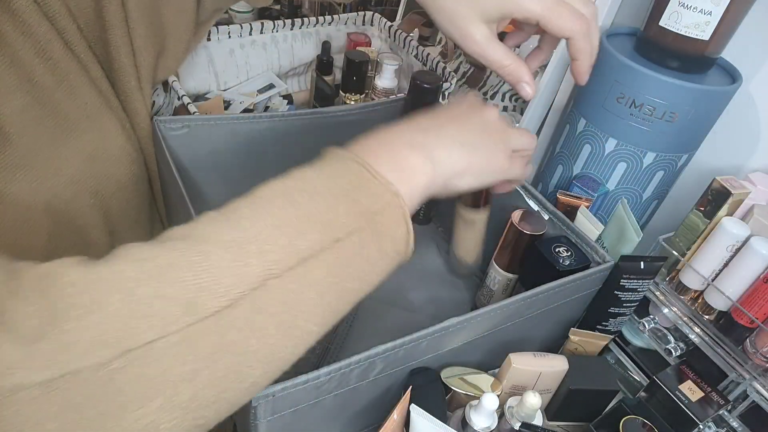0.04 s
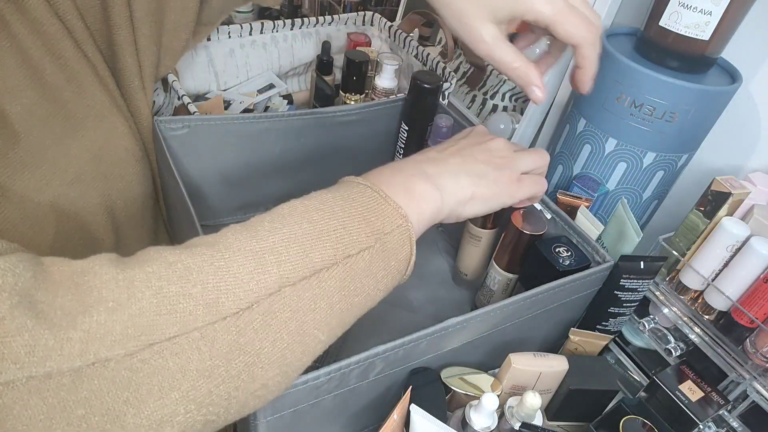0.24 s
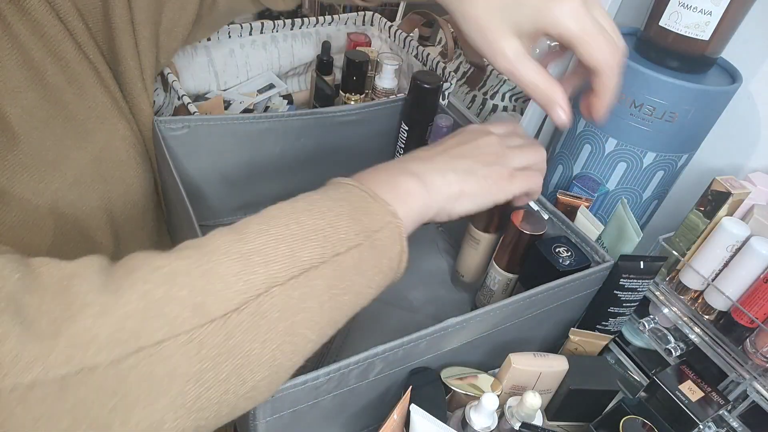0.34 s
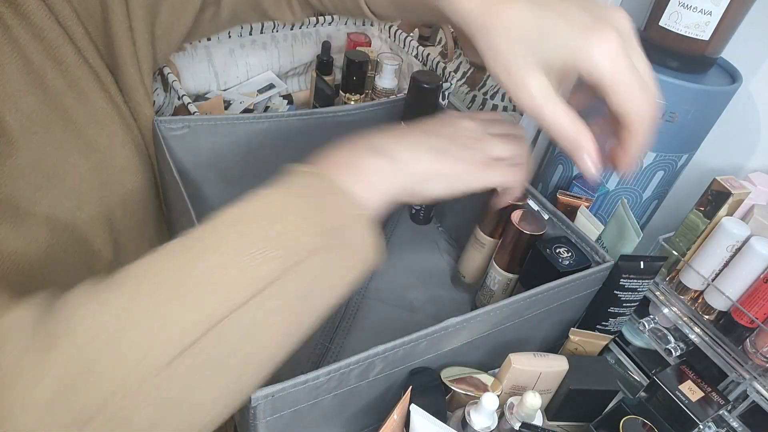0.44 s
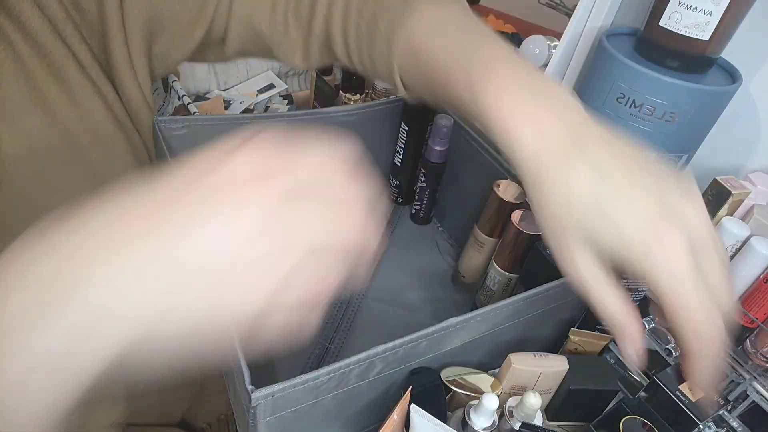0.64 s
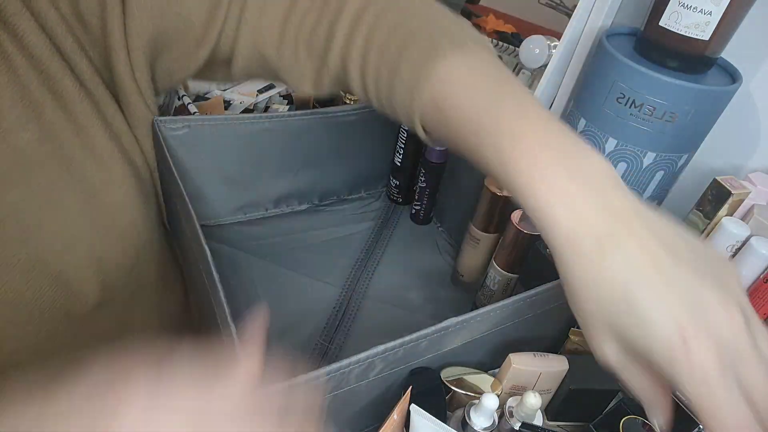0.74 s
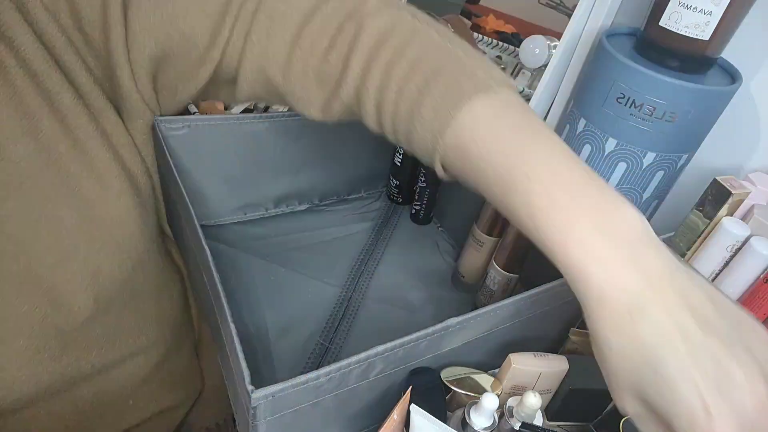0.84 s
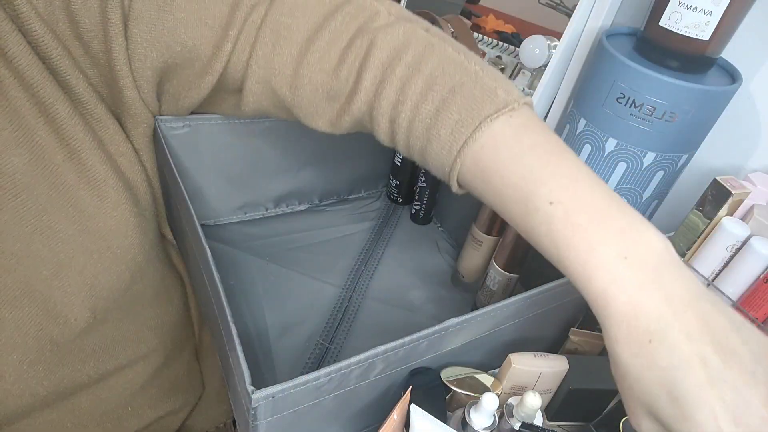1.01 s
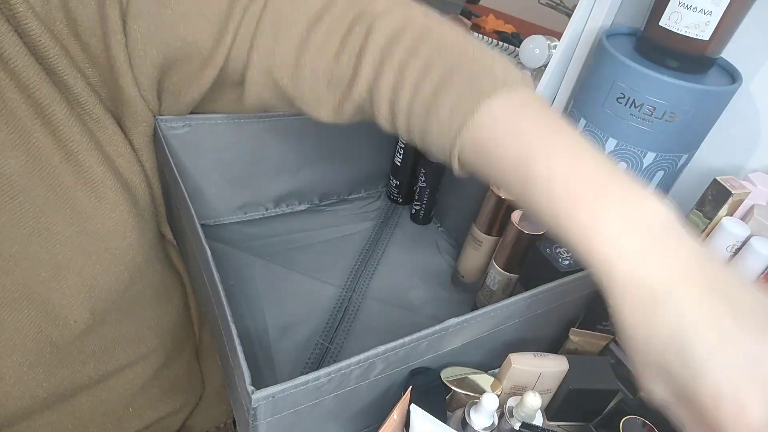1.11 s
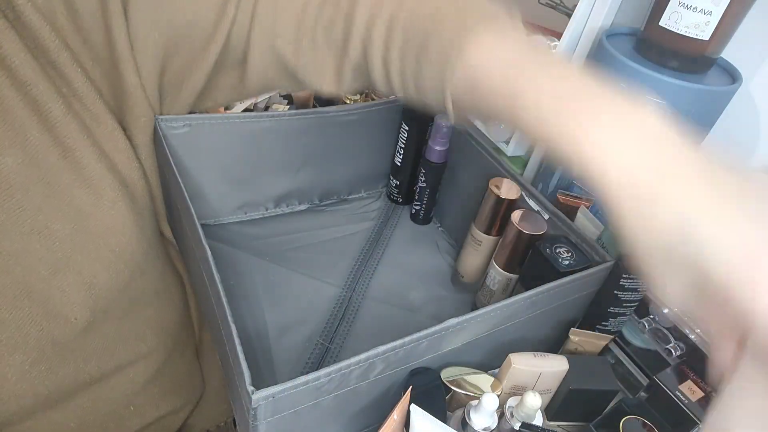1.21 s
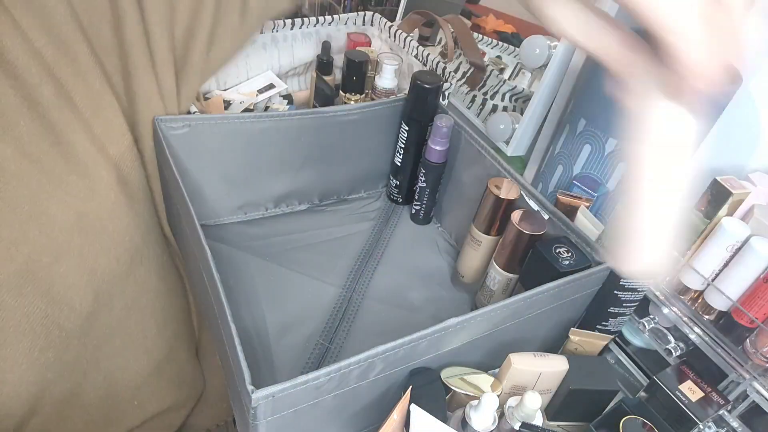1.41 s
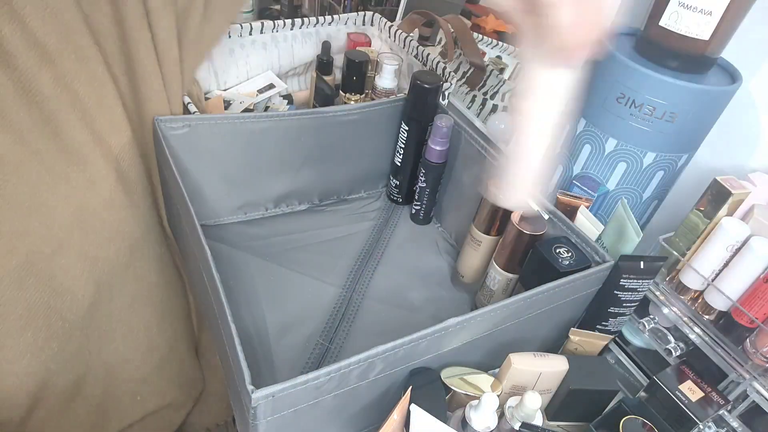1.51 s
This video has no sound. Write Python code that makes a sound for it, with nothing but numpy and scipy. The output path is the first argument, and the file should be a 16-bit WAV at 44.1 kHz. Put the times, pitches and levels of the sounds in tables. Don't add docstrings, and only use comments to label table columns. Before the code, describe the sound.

A hard bottle knock, then dull bumps, a cap click and a glass clink in a box

```python
import sys
import numpy as np
from scipy import signal
from scipy.fft import rfft, irfft
from scipy.io import wavfile
from scipy.ndimage import uniform_filter1d

SR = 44100
rng = np.random.default_rng(int(sys.argv[2]) if len(sys.argv) > 2 else 0)


def nominal_scale(level):
    x = np.asarray(level, float) / 20
    return 10 ** x


def to_wav(sig):
    pcm = np.clip(np.atleast_2d(sig), -1, 1) * 32767
    pcm = np.round(pcm).astype(np.int16)
    wavfile.write(sys.argv[1], SR, pcm.T)


N = 68355


def evened(x):
    return x / np.sqrt(np.mean(x ** 2) + 1e-20)


def read(points, hz):
    f, value = np.transpose(points)
    return np.interp(np.log(hz + 1), np.log(f + 1), value)


def curve(points):
    s, db = np.transpose(points)
    return nominal_scale(np.interp(np.arange(N) / SR, s, db))


def add(mix, s, sound):
    part = mix[round(s * SR):][:len(sound)]
    part += sound[:len(part)]


def noise_pair(shape_gain, same, frames, size):
    a, b, c, d = rng.standard_normal((frames, size // 2 + 1, 4)).T
    same = np.clip(same, -1, 1)[:, None]
    left = a + 1j * b
    right = same * left + np.sqrt(1 - same ** 2) * (c + 1j * d)
    return signal.istft(np.array([left, right]) * shape_gain, nperseg=size, noverlap=size * 3 // 4)[1]


def ring(modes, contact_s, hold_s=1, factor=1, tilt_db=0, side=1):
    t = np.arange(SR // 2) / SR
    x = np.zeros(len(t))
    for k, (hz, db, t60) in enumerate(modes):
        level_db = db + tilt_db * np.log2(hz / modes[1][0]) - 60 * t / t60
        x -= nominal_scale(level_db) * side ** (k + 1) * np.cos(2 * np.pi * hz * factor * t)
    contact = np.sin(np.pi * np.clip(t[:200] / contact_s, 0, 1)) ** 2
    x = np.convolve(x * np.exp(-(t / hold_s) ** 4), contact)
    return x / abs(x).max()


def struck(hits, modes, contact_s, hold_s=1, side=1):
    out = np.zeros(N)
    for s, db, factor, tilt_db in hits:
        add(out, s, nominal_scale(db) * ring(modes, contact_s, hold_s, factor, tilt_db, side))
    return out


def glass_top(x):
    return signal.sosfilt(signal.butter(2, 9300, fs=SR, output="sos"), x)


# frequency in Hz, density in dB per Hz.
TONE = [(20, -2.5), (55, -12), (85, -20), (170, -20.5), (480, -36.5), (1200, -34), (1800, -50), (3000, -59)]
HISS = [(900, 2.5), (1900, -6.5), (2600, -3.5), (5000, -6), (7300, -9), (8200, -24.5), (12400, -24),
        (15000, -63.5)]
# frequency in Hz, likeness 0 to 1.
AIR_SAME = [(40, 0.27), (240, 1), (930, 0.13), (4000, 0.41)]
# time in seconds, level in dB.
GATE = [(0, -8.5), (.235, -5.5), (.26, 7.5), (1.31, 3), (1.39, -5.5), (1.55, -1.5)]
SHAKE = [(0, -69), (.3, -95), (.47, -50), (.6, -59), (1.25, -71.5), (1.4, -82), (1.55, -64)]


def air():
    hz, frames = np.fft.rfftfreq(1024, 1 / SR), N // 256 + 5
    tone_db, hiss_db, shake_corner_hz = -59.5, -69, 55
    tone = evened(noise_pair(nominal_scale(read(TONE, hz))[:, None], read(AIR_SAME, hz), frames, 1024)[:, :N])
    hiss = evened(noise_pair(nominal_scale(read(HISS, hz))[:, None], read(AIR_SAME, hz), frames, 1024)[:, :N])
    shake_gain = 1 / (1 + (hz / shake_corner_hz) ** 4)[:, None]
    shake = evened(noise_pair(shake_gain, .5 + 0 * hz, frames, 1024)[:, :N])
    tone = nominal_scale(tone_db) * curve(GATE) ** 0.38 * tone * nominal_scale([[1.5], [-1.5]])
    hiss = nominal_scale(hiss_db) * curve(GATE) * hiss
    return tone + hiss + curve(SHAKE) * shake * nominal_scale([[2.5], [-2.5]])


# frequency in Hz, level in dB, T60 in seconds.
SLAM_MODES = [(136, -18, 0.17), (246.8, 4.5, 0.027), (480, 9, 0.02), (615, -12, 0.0025), (830, -9, 0.036),
              (1500, -31, 0.0051), (2170, -6.5, 0.02), (3280, -6, 0.006), (5140, -14.5, 0.0018),
              (7000, -9.5, 0.0027), (10160, -16.5, .003)]
RIM_MODES = [(5230, 7, 0.0087), (5590, 7.5, 0.015), (7050, 0.5, 0.015), (7040, -20.5, 0.002),
             (9100, -24, 0.0066), (10600, -21.5, 0.0037), (12400, -35, 0.0031)]
# start in seconds, level in dB, pitch factor, tilt in dB per octave.
RIM_HITS = [
    (.2476, -47, 0.6, -11.5),
    (.2487, -32, 0.99, -12),
]


def slam():
    landing = struck([(.2473, -4, 1, 0)], SLAM_MODES, contact_s=0.00035)
    return landing + struck(RIM_HITS, RIM_MODES, contact_s=.00009)


# start and length in seconds, level in dB, centre and width in Hz.
RUSTLES = [
    (0.408, 0.032, -55, 7000, 5670),
    (0.418, 0.063, -54, 5500, 7000),
    (0.471, 0.034, -57, 5740, 4960),
    (0.499, 0.094, -59.5, 5800, 2820),
    (0.589, 0.11, -91, 5020, 5000),
    (0.744, 0.2, -67.5, 4960, 1500),
    (0.973, 0.083, -63, 7000, 1500),
    (1.285, 0.026, -55, 4200, 2390),
]


def sleeve():
    out = np.zeros((2, N))
    for s, length, db, hz, width in RUSTLES:
        n = round(length * SR)
        flutter_db = 1.3 * evened(uniform_filter1d(rng.standard_normal(12000), 90))[:n]
        grain = rng.standard_normal((2, 12000))[:, :n] * nominal_scale(flutter_db)
        f = np.fft.rfftfreq(n, 1 / SR)
        grain = irfft(rfft(grain) / (1 + ((f - hz) / (width / 2)) ** 2), n)
        for ear in range(2):
            add(out[ear], s, nominal_scale(db + 1.9 * ear) * np.hanning(n) * evened(grain[ear]))
    return out


# start in seconds, peak in dB, pitch factor, tilt in dB per octave.
KNOCKS = [
    (0.4772, -21.5, 0.95, 2.5),
    (0.6095, -28, 0.97, -1),
    (0.7245, -23.5, 0.95, 2),
    (0.8338, -22.5, 0.96, 3),
    (0.9235, -27, 0.95, -0.5),
    (1.0095, -33.5, 0.98, -8.5),
    (1.2115, -31.5, 0.92, -1),
]
SOFT_KNOCKS = [
    (0.442, -40.5, 1.65, -11.5),
    (1.083, -42, 0.91, -17),
    (1.154, -44.5, 0.955, -11.5),
]
# frequency in Hz, level in dB, T60 in seconds.
BOX_MODES = [(116, -18, 0.052), (251.4, -4.5, 0.16), (506, -9, 0.065), (655, -4.5, 0.03),
             (830, -21.5, 0.06), (877, -7.5, 0.055), (1060, -11.5, .02), (1330, -12, .015)]


def box():
    hits = [(s, db + 4.5, factor, tilt_db) for s, db, factor, tilt_db in list(KNOCKS) + list(SOFT_KNOCKS)]
    return struck(hits, BOX_MODES, contact_s=0.0019, hold_s=0.013, side=-1)


# start in seconds, level in dB, pitch factor, tilt in dB per octave.
CAP_HITS = [
    (1.1010, -9, 1, 3.5),
    (1.1026, -20, 0.98, 16),
    (1.1042, -34, 1, -11.5),
]
# frequency in Hz, level in dB, T60 in seconds.
CAP_MODES = [(673, -13.5, 0.012), (1470, 5, 0.0064), (2170, -0.5, 0.0067), (2790, -2.5, 0.0063),
             (3530, -12.5, 0.018), (3880, -12, 0.0079), (5200, -10.5, .003), (5380, -3.5, 0.0046),
             (7280, -16.5, 0.006), (9500, -21.5, 0.011), (11700, -13, 0.008)]


def cap():
    return glass_top(struck(CAP_HITS, CAP_MODES, contact_s=0.00019))


# start in seconds, level in dB, pitch factor, tilt in dB per octave.
GLASS_HITS = [
    (1.1845, -15.5, 1, 5),
    (1.1850, -11, 0.94, -0.5),
    (1.1891, -25.5, 0.88, 0),
    (1.195, -27, 1, 2),
]
# frequency in Hz, level in dB, T60 in seconds.
GLASS_MODES = [(1163, -15, 0.017), (1470, -10.5, 0.00863), (3046, 1, 0.0048), (3390, 0.5, 0.00564),
               (3984, -3.5, 0.0074), (4586, 1.5, 0.005), (5084, 4, 0.0047), (5520, 3, 0.0047),
               (6967, 2, 0.005), (9300, -25, 0.0093)]
CHIME_MODES = [(8240, -10.5, .2), (8333, -16, .25), (9386, 6.5, 0.14), (10500, -15.5, .3),
               (12760, -1, 0.24)]


def glass():
    clink = glass_top(struck(GLASS_HITS, GLASS_MODES, contact_s=0.00018, side=-1))
    return clink + struck([(GLASS_HITS[0][0], -54.5, 1, 0)], CHIME_MODES, contact_s=.00007)


# start in seconds, level in dB, pitch factor, tilt in dB per octave.
TUBE_HITS = [
    (1.191, -33.5, 0.98, 0.029),
    (1.196, -46.5, 0.64, 0),
    (1.207, -30.5, 1, 0),
]
TAP_HITS = [
    (1.322, -41.5, 0.85, 0),
    (1.3249, -36, 0.95, 0.027),
]
# frequency in Hz, level in dB, T60 in seconds.
TUBE_MODES = [(650, -11.5, 0.086), (689, 0.5, 0.097), (716, -3, 0.02), (1200, -15, 0.043), (1630, -6, 0.03)]
TAP_MODES = [(622, -5.5, 0.16), (644, 0, 0.15), (720, -2.5, 0.12), (1110, -3, 0.035), (1290, -22, 0.034),
             (1570, -7, 0.054)]


def tube():
    tipping = struck(TUBE_HITS, TUBE_MODES, contact_s=0.00056, hold_s=0.074)
    return tipping + struck(TAP_HITS, TAP_MODES, contact_s=0.00049)


# frequency in Hz, T60 in seconds.
ROOM_T60 = [(100, 0.082), (220, 0.93), (500, 0.22), (1000, 0.39), (2000, 0.3), (4000, 0.3), (8000, 0.26)]
# frequency in Hz, likeness 0 to 1.
ROOM_SAME = [(100, 0.98), (250, 0.56), (500, 0.49), (1000, 0.98), (3000, 0.12)]
# frequency in Hz, level in dB.
TAIL_COLOUR = [(150, -10), (215, -15), (285, -16), (380, 1), (600, 0), (1200, 0)]
# time in seconds, gain in dB.
TAIL_GATE = [(0, -10.5), (.36, 4), (.43, 1.5), (.47, 0), (1.3, -0.65), (1.4, -2), (1.55, 1)]
# frequency in Hz, level in dB, T60 in seconds.
TABLE_MODES = [(132, -3, 0.27), (182.3, 4, 0.21), (208.65, -3.5, 0.38), (225.5, -19, 0.22),
               (303.3, -5.5, 0.41), (357.9, -3, 0.28), (430, -6, .14), (485.6, 0, 0.22), (574, -9, 0.35),
               (661, -6, 0.21), (822, -7.5, 0.12), (890, 2, 0.12), (1114, -12, 0.24)]
WET_DB = dict(box=-4, slam=-1.5, cap=-2, glass=-2, tube=-9.5)
EARLY_DB = dict(box=-14, slam=-7, cap=-4, glass=-6, tube=-12)
TABLE_DB = dict(box=-22, slam=-19)
PAN_DB = dict(box=1.8, slam=-0.5, cap=2.5, glass=11.5, tube=8)
LEFT_LAG = dict(box=-3, slam=-1, cap=3, glass=5, tube=3)


def table_hum(t):
    rise_s, swell_hz, swell_db, swell_s, swell_t60 = 0.019, 213.8, -7, .055, 0.28
    modes = sum(nominal_scale(db - 60 * t / t60) * np.sin(2 * np.pi * hz * t) for hz, db, t60 in TABLE_MODES)
    swell = nominal_scale(swell_db - 60 * (t - swell_s) / swell_t60) * np.sin(2 * np.pi * swell_hz * t)
    return np.clip(t / rise_s, 0, 1) ** 2 * modes + np.clip(t / swell_s, 0, 1) ** 3 * swell


def room(x, name, gap_s=0.0032, early_t60=0.03, low_cut_hz=162):
    hz, t = np.fft.rfftfreq(512, 1 / SR), np.arange(200) * 128 / SR
    same = read(ROOM_SAME, hz)
    tail_db = read(TAIL_COLOUR, hz)[:, None] - 60 * t / read(ROOM_T60, hz)[:, None]
    tail = noise_pair(nominal_scale(tail_db), same, 200, 512)
    t = np.arange(tail.shape[1]) / SR
    tail = tail * np.clip(t / gap_s, 0, 1) ** 2
    early = noise_pair(1, same, 200, 512) * nominal_scale(-60 * t / early_t60) * (t > .0004)
    hum = table_hum(t)
    far = nominal_scale(WET_DB[name]) * tail / np.linalg.norm(tail[0])
    far = far + nominal_scale(TABLE_DB.get(name, -99)) * hum / np.linalg.norm(hum)
    far = signal.fftconvolve(x[None], far, axes=1)[:, :N] * curve(TAIL_GATE)
    early = early / np.linalg.norm(early[0])
    near = x + nominal_scale(EARLY_DB[name]) * signal.fftconvolve(x[None], early, axes=1)[:, :N]
    near = np.array([np.roll(near[0], LEFT_LAG[name]), near[1]])
    near = near * nominal_scale(np.array([[.5], [-.5]]) * PAN_DB[name])
    return signal.sosfilt(signal.butter(2, low_cut_hz, "high", fs=SR, output="sos"), near + far)


def scene():
    parts = dict(slam=slam(), box=box(), cap=cap(), glass=glass(), tube=tube())
    return air() + sleeve() + sum(room(x, name) for name, x in parts.items())


def low_pass(x):
    return signal.sosfilt(signal.butter(12, 15070, fs=SR, output="sos"), x)


def record(dry):
    edge = signal.firwin(511, 15100, window=("kaiser", 9), fs=SR)
    return low_pass(signal.oaconvolve(dry, edge[None], "same"))


dry = scene()
out = record(dry)
to_wav(out)
```